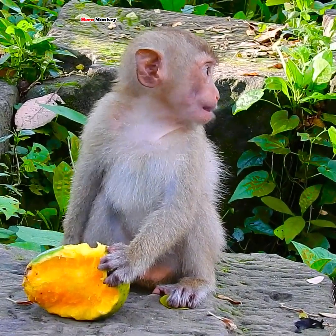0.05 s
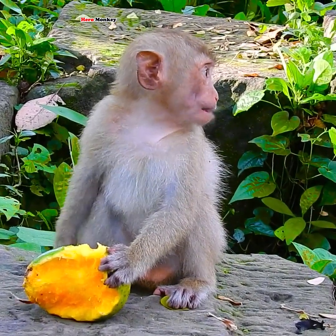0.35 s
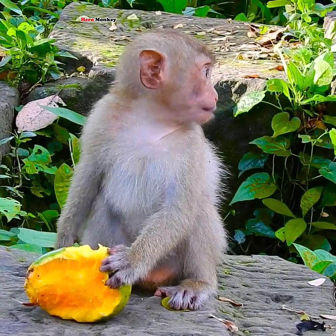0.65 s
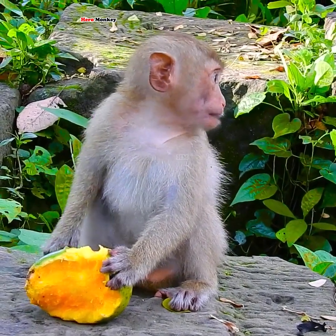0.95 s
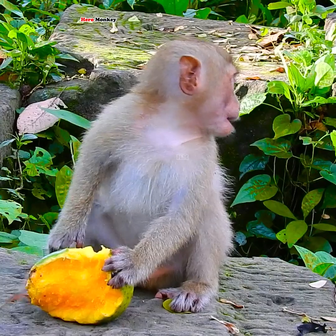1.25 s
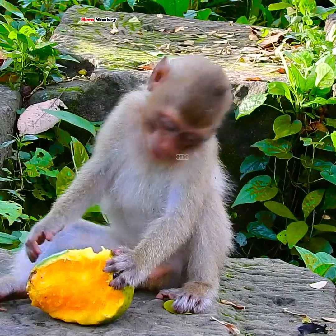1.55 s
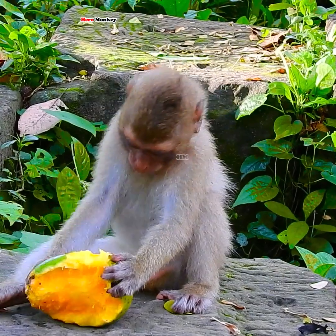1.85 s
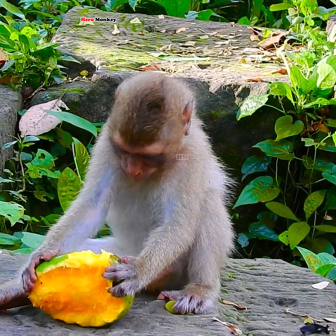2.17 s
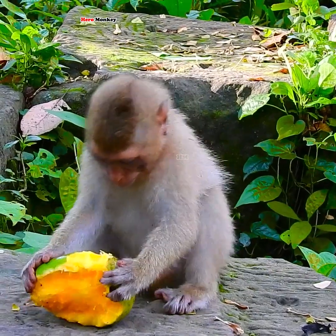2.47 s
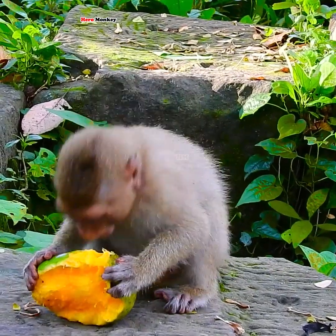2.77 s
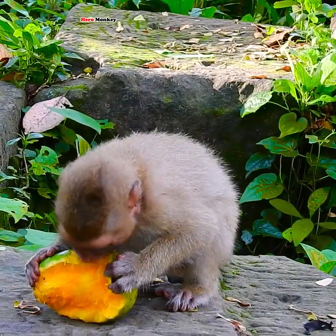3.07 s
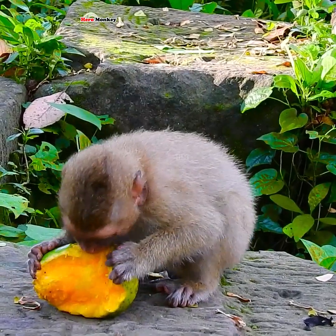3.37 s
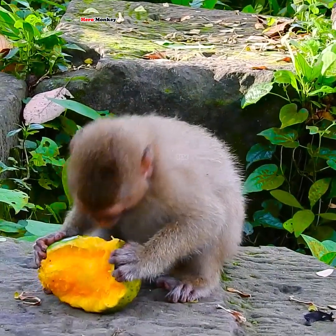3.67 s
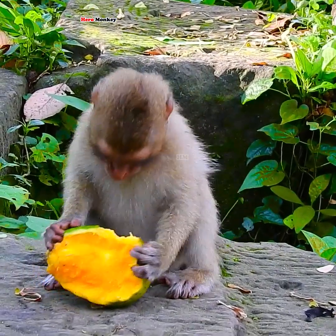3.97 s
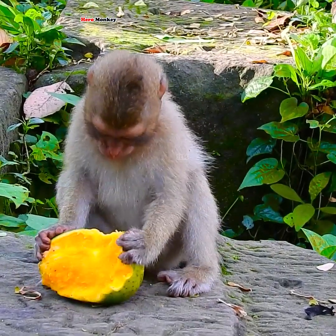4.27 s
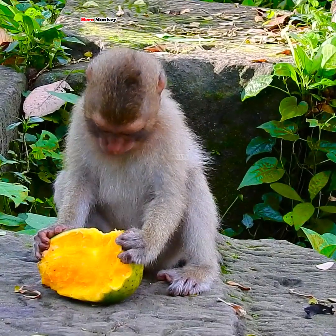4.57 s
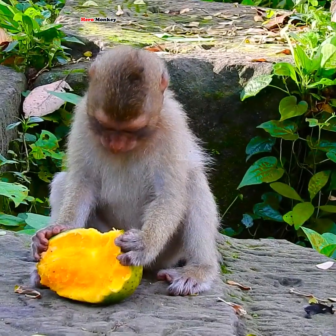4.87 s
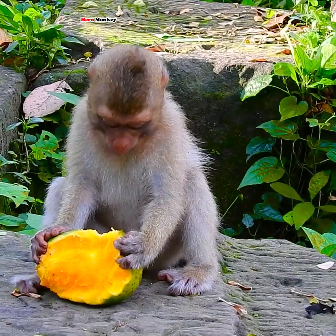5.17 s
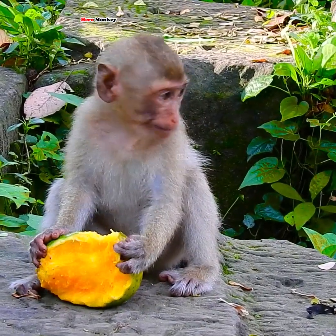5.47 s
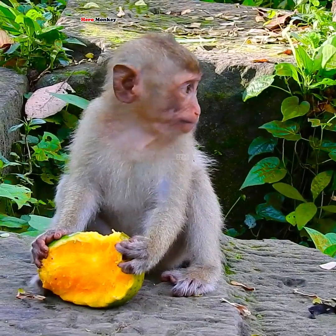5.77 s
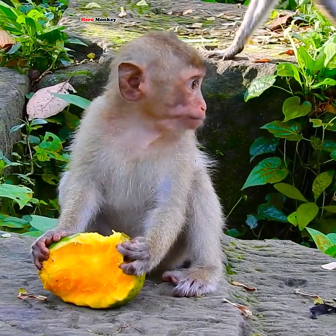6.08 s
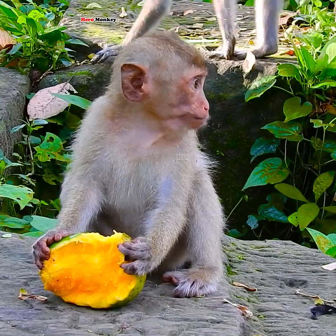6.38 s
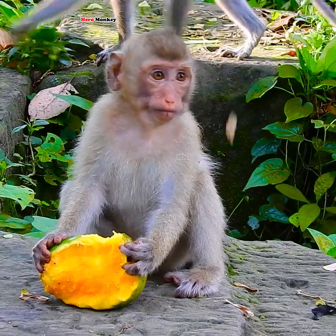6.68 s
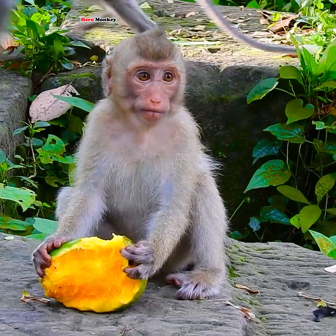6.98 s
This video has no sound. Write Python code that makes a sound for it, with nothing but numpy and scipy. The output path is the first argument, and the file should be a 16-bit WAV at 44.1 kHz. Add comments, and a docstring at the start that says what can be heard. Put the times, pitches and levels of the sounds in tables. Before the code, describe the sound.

A bird trills and others hoot over insect hiss while a monkey handles a mango, then a dry stick cracks loudly.

```python
"""Insects hiss, a distant engine hums and leaves rustle at a forest edge while a far bird repeats a short
phrase of hoots and yelps. The birds are unseen, probably barbets; their near-pure notes echo off the trees.
Faint pipes and one falling whistle come from other birds, then a nearer one starts a long rolling trill.
A young monkey handles a mango on a stone: peel, claws and leaf litter tick. Near the end a dry stick
crunches and cracks close by as its fibres snap, and the foliage returns a bright echo."""
import sys
import numpy as np
from scipy import signal
from scipy.fft import rfft, irfft
from scipy.io import wavfile
from scipy.ndimage import uniform_filter1d

SR = 44100
rng = np.random.default_rng(int(sys.argv[2]) if len(sys.argv) > 2 else 0)


def store_pcm(level_fs):
    """Save levels as 16-bit WAV."""
    pcm = np.round(np.clip(level_fs, -1, 1) * 32767).astype(np.int16)
    wavfile.write(sys.argv[1], SR, np.atleast_2d(pcm).T)


N = 310023
T = np.arange(N) / SR
FREQS = np.fft.rfftfreq(N, 1 / SR)


def amp(db):
    """Decibels to gain."""
    return 10 ** (np.asarray(db) / 20)


def unit(x):
    """Scale to rms 1."""
    return x / np.sqrt(np.mean(x ** 2))


def on_log_axis(points):
    """Interpolate (f/Hz, value) points over log frequency."""
    hz, value = np.transpose(points)
    return np.interp(np.log(FREQS + 1), np.log(hz), value)


def colour(x, spectrum):
    """Filter by (f/Hz, gain/dB) points."""
    return irfft(rfft(x) * amp(on_log_axis(spectrum)), N)


def resonate(x, hz, q):
    """One resonance, gain 1 at its centre."""
    return signal.lfilter(*signal.iirpeak(min(hz, SR / 3), max(q, 1), fs=SR), x)


def walk(rate_hz):
    """Smooth random drift, rms 1."""
    hold = max(int(SR / rate_hz), 2)
    steps = np.repeat(rng.standard_normal(N // hold + 1), hold)[:N]
    return unit(uniform_filter1d(uniform_filter1d(steps, hold), hold))


def swell(at_s, rise_s, fall_s):
    """Exponential rise and fall about a peak."""
    return np.exp(-np.maximum((at_s - T) / rise_s, (T - at_s) / fall_s))


def grains(spread_db):
    """Dense clicks: 16-sample noise grains of uneven, capped size."""
    sizes = np.minimum(rng.exponential(size=N // 16 + 1), 3.5)
    return unit(rng.standard_normal(N) * amp(spread_db * np.repeat(sizes, 16)[:N]))


def add(track, at_s, sound):
    """Mix a short sound into a track."""
    start = max(int(at_s * SR), 0)
    part = track[start:start + len(sound)]
    part += sound[:len(part)]


def place(x, pan_db, lead_ms=0):
    """Pan by level and delay; positive is louder and earlier on the left."""
    delayed = irfft(rfft(x) * np.exp(-2j * np.pi * FREQS * lead_ms / 1000), N)
    return np.array([x * amp(pan_db / 2), delayed * amp(-pan_db / 2)])


# Likeness of the two ears in open air: f/Hz, correlation
EAR_CORRELATION = [(60, 0.92), (130, 0.97), (290, 0.78), (1400, 0.79), (3100, 0.54), (6800, 0.23),
                   (12000, -0.45)]


def diffuse():
    """White noise from all round: alike in both ears in the bass, less so in the treble."""
    alike = np.clip(on_log_axis(EAR_CORRELATION), -1, 1)
    mid, side = rfft(rng.standard_normal((2, N))) * np.sqrt([1 + alike, 1 - alike])
    return unit(irfft([mid + side, mid - side], N))


def forest(x, t60_s, build_s):
    """Scatter from trunks and leaves: a diffuse echo that builds and decays."""
    response = diffuse() * amp(-60 * T / t60_s) * (1 - np.exp(-T / build_s))
    response /= np.sqrt(np.sum(response ** 2) / 2)
    return signal.fftconvolve(x[None], response, axes=1)[:, :N]


# Outdoor air and insect hiss spectra: f/Hz, gain/dB
AIR_SPECTRUM = [(100, -5), (300, 3), (500, -2.5), (900, 5.5), (1400, -2), (2400, -6.5), (4000, -12),
                (8000, -10.5), (15000, -32)]
INSECT_SPECTRUM = [(3000, -7), (4100, -5), (4700, -1.5), (5300, 1.5), (5900, -2), (7100, 2.5), (7800, -9),
                   (9800, -12.5), (12000, -11), (15500, -33)]


def air_and_insects():
    """Soft air, stirring unevenly in the low mids, and the hiss of many far insects."""
    air = unit(colour(diffuse(), AIR_SPECTRUM)) * amp(-52.5 + 0.5 * walk(3.46))
    stir = np.zeros((2, N))
    for hz in np.geomspace(310, 620, num=4):
        band = resonate(resonate(diffuse(), hz, q=3.4), hz, q=3.4)
        stir += band * amp(4.3 * walk(22))
    insects = unit(colour(diffuse(), INSECT_SPECTRUM)) * amp(-52.5 + 0.083 * walk(1.9) + walk(30))
    return air + amp(-59) * unit(stir) + insects


# Engine firing rate: t/s, f/Hz
FIRING_RATE = [(0.0, 73.3), (0.76, 73.4), (2.89, 75.2), (2.96, 76.1), (4.5, 76.2)]
# Firing note loudness: t/s, level/dB
FIRING_LEVEL = [(0.05, -38.5), (0.5, -34.5), (0.57, -38.5), (1.63, -30), (1.76, -36), (2.29, -29.5),
                (2.57, -36.5), (3.97, -28.5), (4.15, -33.5), (4.21, -41), (4.39, -34), (4.61, -46),
                (4.95, -37), (5.6, -43)]
# Low rumble spectrum: f/Hz, gain/dB
RUMBLE_SPECTRUM = [(20, -44), (32, -21), (45, -4), (70, -2.5), (100, 3), (140, 0), (180, -14.5), (230, -14),
                   (290, -32.5), (500, -48)]


def engine():
    """Distant engine: only the wavering firing note and two weak overtones carry, over a rumble."""
    firing_hz = np.interp(T, *np.transpose(FIRING_RATE))
    level_db = np.interp(T, *np.transpose(FIRING_LEVEL))
    phase = 2 * np.pi * np.cumsum(firing_hz) / SR
    octave = amp(-26 + 2 * walk(19)) * np.sin(2 * phase)
    hum = np.sqrt(2) * (np.sin(phase) + octave + amp(-33.5) * np.sin(3 * phase))
    hum *= amp(level_db + 0.84 * walk(9))
    rumble = unit(colour(diffuse(), RUMBLE_SPECTRUM))
    return hum + amp(-40.5) * rumble


def bird_note(hz, length_s, sag, flatness, taper, octave_db):
    """Near-pure note: pitch and level arch together as syrinx pressure rises and falls."""
    progress = np.linspace(0, 1, int(length_s * SR))
    lean, depth = np.exp(0.153 * rng.standard_normal(2))
    edge = np.abs(2 * progress ** lean - 1)  # 0 at the crest, 1 at the ends
    phase = 2 * np.pi * np.cumsum(hz * (1 - sag * depth * edge ** flatness)) / SR
    envelope = np.sqrt(2) * (1 - edge ** 2) ** taper
    return envelope * (np.sin(phase) + amp(octave_db) * np.sin(2 * phase))


# Faint pipes: t/s, f/Hz, level/dB, length/s
PIPE_NOTES = [(1.267, 1257, -58.5, .12), (1.419, 1270, -64, 0.17), (2.959, 1342, -59.5, 0.13)]


def piping_bird():
    """Thin, level notes from far off that barely clear the hiss."""
    voice = np.zeros(N)
    for at_s, hz, db, length_s in PIPE_NOTES:
        pipe = bird_note(hz, length_s, sag=0.023, flatness=1.8, taper=1.4, octave_db=-40)
        add(voice, at_s - length_s / 2, amp(db) * pipe)
    return voice + forest(voice, t60_s=0.49, build_s=0.02)


# Falling whistle contour: t/s, f/Hz, level/dB
WHISTLE_CONTOUR = [(1.9, 3650, -74), (1.98, 3250, -63), (2.17, 2843, -61.5), (2.3, 2720, -71),
                   (2.37, 2420, -55), (2.5, 1871, -51), (2.6, 1668, -62), (3.0, 1577, -64.5),
                   (3.08, 1520, -75)]


def whistling_bird():
    """One hoarse falling whistle deep in the trees; the echo holds the earlier, higher pitches."""
    at_s, hz, db = np.transpose(WHISTLE_CONTOUR)
    pitch_hz = np.interp(T, at_s, hz) * (1 + 0.028 * walk(160))
    envelope = np.interp(T, at_s, amp(db), left=0, right=0) * amp(2.9 * walk(45))
    voice = np.sqrt(2) * envelope * np.sin(2 * np.pi * np.cumsum(pitch_hz) / SR)
    pan_db = -4.0
    echo = forest(voice, t60_s=2.1, build_s=0.021) * amp([[pan_db / 2], [-pan_db / 2]])
    return place(voice, pan_db, lead_ms=-0.042) + amp(3.5) * echo


# Far bird's phrases: first hoot t/s, first yelp t/s, note spacing/s, hoot f/Hz, yelp f/Hz,
# hoot base level/dB, yelp level/dB, yelp count
FAR_PHRASES = [(-.14, 0.079, 0.095, 906, 1127, -65, -44.5, 4),
               (0.794, 0.882, 0.092, 908, 1113, -51.5, -45, 5),
               (1.723, 1.828, 0.092, 906, 1095, -48.5, -46.5, 5),
               (2.616, 2.714, 0.089, 925, 1100, -47.5, -45.5, 5),
               (3.515, 3.712, .105, 934, 1084, -46.5, -44, 3),
               (4.527, 4.721, .098, 935, 1104, -43.5, -46.5, 1),
               (5.358, 5.456, 0.096, 921.5, 1067, -43, -50, 4),
               (6.761, 6.963, 0.1, 917, 1035, -45.5, -43, 1)]


def far_bird():
    """Two hoots, the second stronger, then one to five higher yelps, half lost in their echo."""
    hoot_s, hoot_growth_db = 0.058, 2.5
    yelp_s, yelp_fade_db = 0.048, 2.5
    voice = np.zeros(N)
    for hoot_at_s, yelp_at_s, gap_s, hoot_hz, yelp_hz, hoot_db, yelp_db, count in FAR_PHRASES:
        for k in range(2):
            hoot = bird_note(hoot_hz, hoot_s, sag=0.048, flatness=2.15, taper=1.1, octave_db=-27)
            hoot *= amp(hoot_db + (k + 0.5) * hoot_growth_db)
            add(voice, hoot_at_s + k * gap_s - hoot_s / 2, hoot)
        for k, progress in enumerate(np.linspace(0, 1, round(count))):
            yelp = bird_note(yelp_hz, yelp_s, sag=0.2695, flatness=2.09, taper=1.0, octave_db=-21)
            yelp *= amp(yelp_db - yelp_fade_db * progress ** 5)
            add(voice, yelp_at_s + k * gap_s - yelp_s / 2, yelp)
    echo = forest(resonate(voice, hz=922, q=4.7), t60_s=2.24, build_s=0.033)
    return place(voice, pan_db=-4.5, lead_ms=-0.025) + amp(-0.5) * echo


def near_bird(start_s=4.317, count=41):
    """A roll of arched notes that climbs and swells; gaps and notes lengthen as the bird tires."""
    first_gap_s, last_gap_s = 0.05935, 0.0841
    first_note_s, last_note_s = 0.037, 0.062
    start_hz, top_hz, climb_s = 780, 882, 0.21
    start_db, full_db, swell_s = -41.5, -33.5, 0.89
    gaps_s = first_gap_s + (last_gap_s - first_gap_s) * np.linspace(0, 1, count - 1) ** 2
    lengths_s = first_note_s + (last_note_s - first_note_s) * np.linspace(0, 1, count) ** 2
    elapsed_s = np.r_[0, np.cumsum(gaps_s)]
    pitches_hz = top_hz + (start_hz - top_hz) * np.exp(-elapsed_s / climb_s)
    levels_db = full_db + (start_db - full_db) * np.exp(-elapsed_s / swell_s)
    voice = np.zeros(N)
    for at_s, hz, db, length_s in zip(start_s + elapsed_s, pitches_hz, levels_db, lengths_s):
        stronger, sharper, longer = rng.standard_normal(3)
        length_s *= np.exp(0.0507 * longer)
        hz *= 1 + 0.0057 * sharper
        note = bird_note(hz, length_s, sag=0.241, flatness=3.45, taper=1.0, octave_db=-27.5)
        add(voice, at_s - length_s / 2, amp(db + 0.5 * stronger) * note)
    # the trees return the crests best, so a thin tone hangs between notes
    echo = forest(resonate(voice, hz=895.5, q=18.0), t60_s=0.97, build_s=0.039)
    return place(voice, pan_db=2.5, lead_ms=0.046) + amp(-1.5) * echo


# Peel, claw and litter ticks: t/s, level/dB, ring f/Hz, left minus right/dB
HANDLING_TICKS = [(1.4471, -31, 6600, -1), (1.595, -34, 7300, 2), (2.4768, -26.5, 6780, -1.5),
                  (3.376, -18.5, 6600, 0), (4.4952, -36, 2530, 0), (5.0249, -31, 4800, 0),
                  (5.5217, -29, 7160, 0), (5.8026, -26.5, 6530, -2), (6.264, -12.5, 6860, 7),
                  (6.68, -31, 6500, 4)]
# Brushed leaves: t/s, level/dB, rise/s, fall/s, centre f/Hz
LEAF_RUSTLES = [(.01, -47.5, .03, 0.2, 5800), (.2, -51, .08, 0.11, 3370), (2.174, -42.5, .012, 0.021, 2450),
                (2.206, -45, .024, .054, 6000), (2.402, -45.5, 0.0094, .012, 6470),
                (2.44, -46, .009, 0.013, 6170), (6.257, -43, .003, .0023, 3020),
                (6.398, -47, .0033, .004, 2900)]


def monkey_handling():
    """Peel, claws and litter tick with a brief ring and a faint crackle; brushed leaves rustle."""
    out = np.zeros((2, N))
    age_s = T[:1024]
    for at_s, db, hz, pan_db in HANDLING_TICKS:
        ring = np.sin(2 * np.pi * hz * age_s) * np.exp(-((age_s - 0.0012) / 0.00026) ** 2)
        band = resonate(rng.standard_normal(len(age_s)), hz, q=2.1)
        crackle = unit(resonate(band, hz * 0.88, q=1.2)) * np.exp(-age_s / 0.003)
        tick = ring + amp(-10.5) * crackle
        add(out[0], at_s, tick * amp(db + pan_db / 2))
        add(out[1], at_s, np.roll(tick, 2) * amp(db - pan_db / 2))
    out += amp(-12) * forest(out.mean(axis=0), t60_s=0.96, build_s=0.007)
    for at_s, db, rise_s, fall_s, hz in LEAF_RUSTLES:
        clicks = np.array([grains(spread_db=2.6) for _ in range(2)])
        leaves = resonate(resonate(clicks, hz, q=1.0), hz, q=0.9)
        out += amp(db) * swell(at_s, rise_s, fall_s) * unit(leaves)
    return colour(out, [(7500, 0.0), (9500, -13), (14000, -15)])  # soft leaves give little top


# Fibres snapping: t/s, level/dB
FIBRE_SNAPS = [(6.426, -4.5), (6.4329, -6.5), (6.4378, -13), (6.458, -11.5), (6.4633, -6)]
# Wood giving way: t/s, level/dB, rise/s, fall/s
WOOD_CRUNCHES = [(6.417, -40, 0.015, 0.0096), (6.429, -25.5, 0.0057, 0.0037), (6.457, -32, 0.0081, 0.0094)]
# Snap, crunch and foliage echo spectra: f/Hz, gain/dB
SNAP_SPECTRUM = [(300, -14), (1000, -12), (2000, -16), (3600, -20), (4400, -7.5), (6100, 4.5), (7300, -2),
                 (8600, -1), (11000, -18), (15500, -38)]
CRUNCH_SPECTRUM = [(80, -21), (250, 6), (500, -1), (1000, 4.5), (1900, 2), (3000, 7), (3800, 3.5),
                   (4700, -3), (7000, -3), (14000, -52)]
FOLIAGE_SPECTRUM = [(300, -29), (1200, -18), (2200, -15), (3600, -10.5), (5000, -6.5), (6100, -0.5),
                    (7100, 3), (8200, -5.5), (9500, -15), (12000, -26), (15000, -39)]


def stick():
    """Dry wood crunches as it bends and its fibres snap in two volleys; stone and foliage echo."""
    fibres = np.zeros(N)
    age_s = T[:1024]
    decay = np.exp(-age_s / 0.0012) + amp(-14.5) * np.exp(-age_s / 0.006)  # snap, then splinters
    for at_s, db in FIBRE_SNAPS:
        burst = rng.choice([-1, 1], len(age_s)) * decay
        add(fibres, at_s + 0.001, amp(db) * burst)
    snaps = colour(fibres, SNAP_SPECTRUM)
    strain = sum(amp(db) * swell(at_s, rise_s, fall_s) for at_s, db, rise_s, fall_s in WOOD_CRUNCHES)
    crunch = strain * unit(colour(grains(spread_db=4.1), CRUNCH_SPECTRUM))
    direct = place(snaps, pan_db=2.0, lead_ms=0.052) + place(crunch, pan_db=6.5, lead_ms=0.052)
    stone_echo = forest(snaps + crunch, t60_s=0.13, build_s=0.00087)
    # returns from countless leaves merge into a dying hiss
    leaf_echo = unit(colour(diffuse(), FOLIAGE_SPECTRUM)) * swell(at_s=6.47, rise_s=0.013, fall_s=0.15)
    return direct + amp(-10.5) * stone_echo + amp(-32) * leaf_echo


def scene():
    """Birds, monkey and stick over the engine, air and insects."""
    birds = near_bird() + far_bird() + whistling_bird() + piping_bird()
    return birds + engine() + air_and_insects() + monkey_handling() + stick()


def record(dry):
    """Steep low-pass at 15.7 kHz."""
    return signal.sosfilt(signal.ellip(10, 0.1, 80, 15700, fs=SR, output="sos"), dry)


dry = scene()
out = record(dry)
store_pcm(out)
```